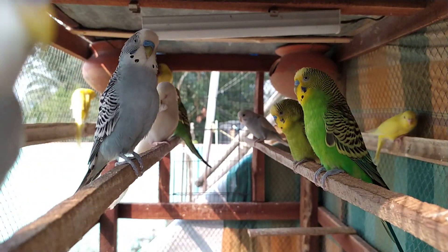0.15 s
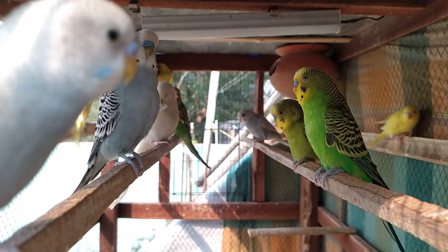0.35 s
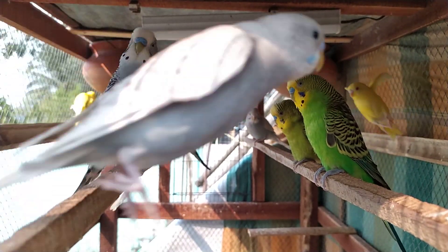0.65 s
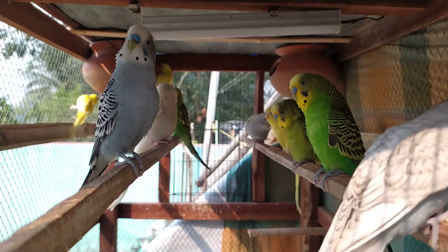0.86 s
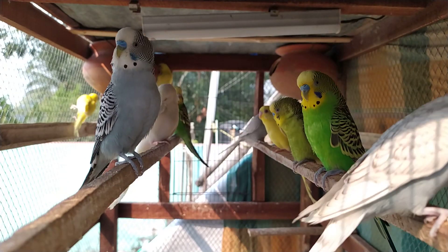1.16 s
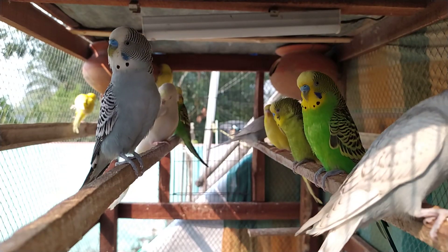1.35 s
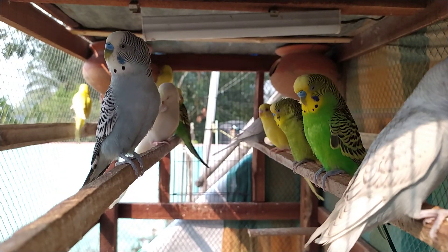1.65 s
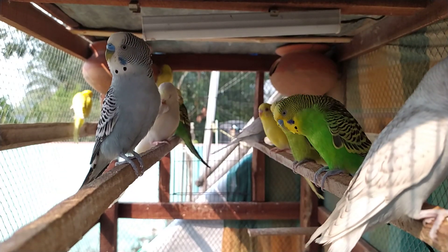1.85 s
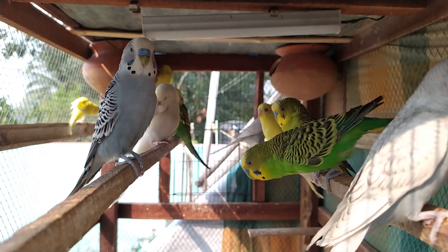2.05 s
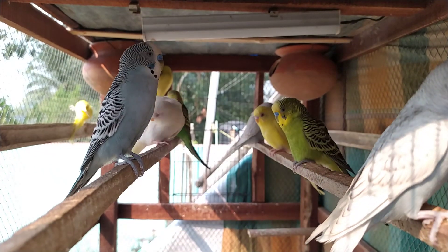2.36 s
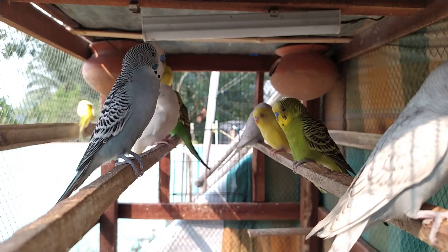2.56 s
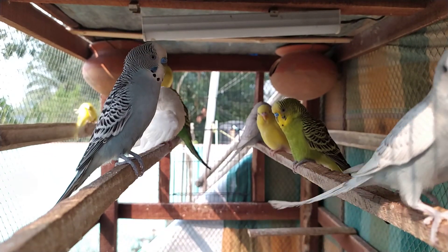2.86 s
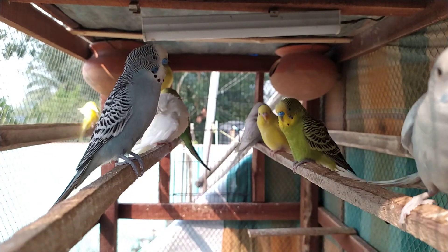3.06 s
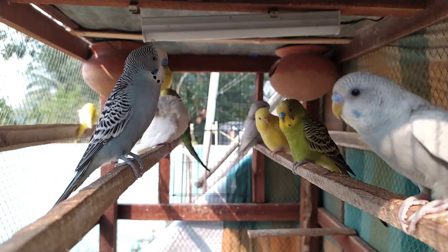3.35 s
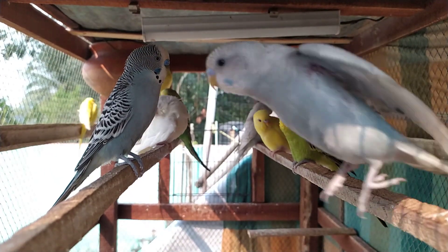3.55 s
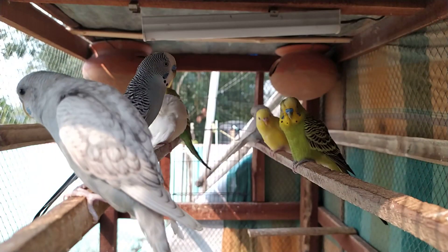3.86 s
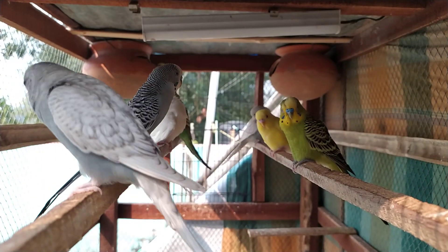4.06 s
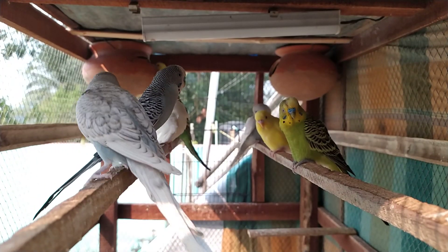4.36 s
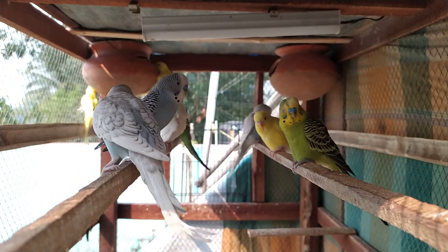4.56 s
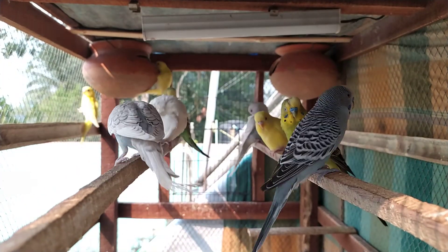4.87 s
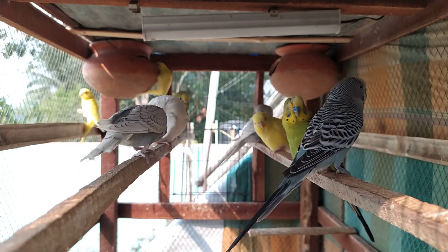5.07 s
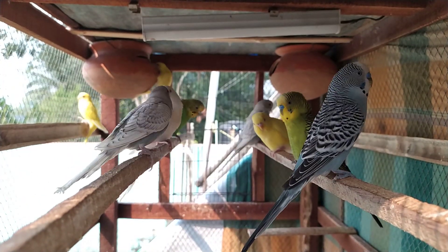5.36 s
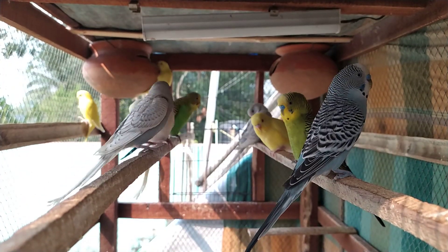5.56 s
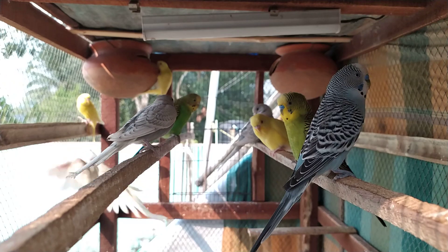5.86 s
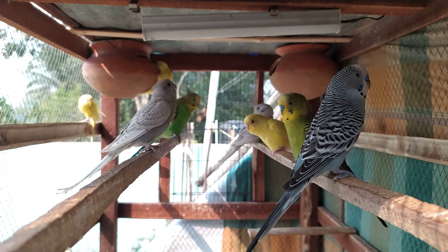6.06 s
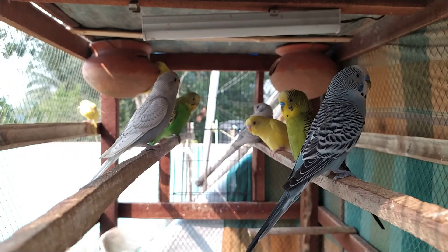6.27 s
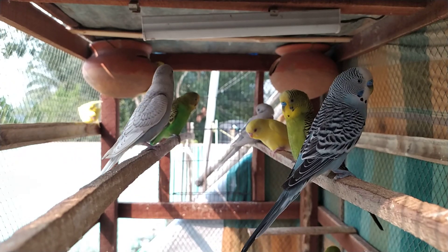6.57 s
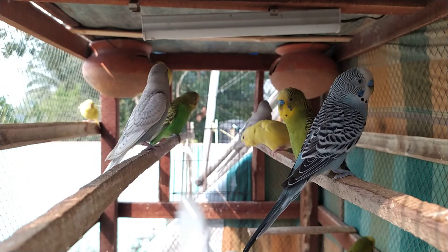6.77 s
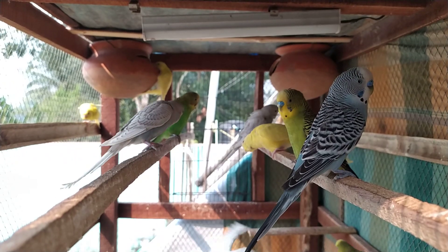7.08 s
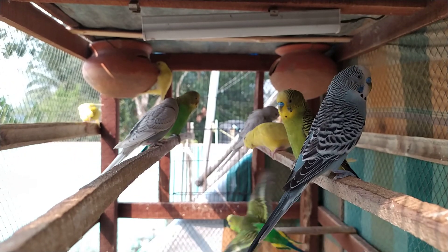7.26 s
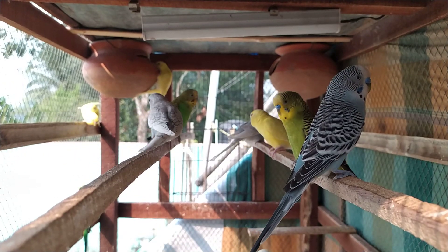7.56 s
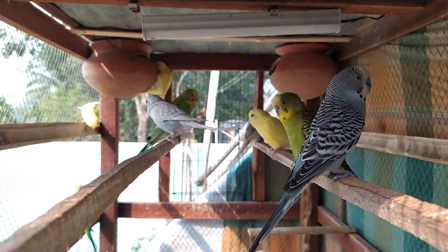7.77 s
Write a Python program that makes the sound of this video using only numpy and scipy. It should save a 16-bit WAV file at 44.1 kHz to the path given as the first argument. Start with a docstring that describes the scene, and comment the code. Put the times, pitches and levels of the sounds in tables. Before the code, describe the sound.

Small parrots chatter in an aviary: quick high chirps, buzzy warbled phrases and sudden harsh squawks over faint distant twittering and low wind rumble.

```python
"""Budgerigars close to a phone in a wooden aviary whistle fluttering syrinx notes and rasp loud squawks in puffs.
Far birds give low calls and even trills as gliding tones, a dove coos and the flock twitters at the far end.
Claws knock on perches as damped thuds; short flights, wings and feathers are shaped bands of noise.
The left port is open, the right is half covered and muffled; wind rumbles on both."""
import sys
import numpy as np
from scipy import signal
from scipy.fft import rfft, irfft, next_fast_len
from scipy.io import wavfile

SR = 44100
rng = np.random.default_rng(int(sys.argv[2]) if len(sys.argv) > 2 else 0)


def unload_wav(signal):
    """Save mono or channel-first audio to the path in sys.argv[1] as 16-bit WAV at rate SR, clipped to [-1, 1]."""
    wavfile.write(
        sys.argv[1],
        SR,
        np.round(np.clip(np.atleast_2d(signal).T, -1, 1) * 32767).astype(np.int16),
    )


N = 349272


def undb(db):
    """Decibels to gain."""
    return 10 ** (np.asarray(db) / 20)


def unit(x):
    """Scale to rms 1."""
    return x / np.sqrt(np.mean(x ** 2))


def noise():
    """White noise as long as the scene."""
    return rng.standard_normal(N)


def band(x, lo_hz, hi_hz, order=2):
    """Butterworth band-pass."""
    edges_hz = [lo_hz, min(hi_hz, SR / 2.1)]
    return signal.sosfilt(signal.butter(order, edges_hz, "band", fs=SR, output="sos"), x)


def walk(rate_hz):
    """Random levels drawn at a steady rate and joined by straight lines, scaled to rms 1."""
    step = int(SR / rate_hz)
    knots = N // step + 2
    return unit(np.interp(np.arange(N) / step, np.arange(knots), rng.standard_normal(knots)))


def running_phase(hz):
    """Phase in radians of a tone whose pitch moves."""
    return 2 * np.pi * np.cumsum(hz) / SR


def add(out, start_s, x):
    """Mix a sound in at its time."""
    i = int(start_s * SR)
    out[i:i + len(x)] += x[:N - i]


def swell(n, rise_s, fall_s):
    """Rounded rise and fall over n samples."""
    s = np.arange(n) / SR
    return np.sin(np.pi / 2 * np.clip(np.minimum(s / rise_s, s[::-1] / fall_s), 0, 1)) ** 2


# Late echo from the yard: decay time, level beside the early echo, upper edge
YARD_T60_S, YARD_DB, YARD_TOP_HZ = 0.35, -16, 4800


def woodwork(x, t60_s, wet_db):
    """Short dense echo from roof, nest pots and back wall, then a faint, dull, long one from the yard."""
    s = np.arange(int(YARD_T60_S * SR)) / SR
    air = rng.standard_normal(len(s))
    near = band(air, 200, 13800, order=1) * np.exp(-np.log(1000) * s / t60_s)
    yard = undb(YARD_DB) * band(air, 230, YARD_TOP_HZ, order=3) * np.exp(-np.log(1000) * s / YARD_T60_S)
    tail = (near + yard) * (s > .002)
    return x + undb(wet_db) * signal.fftconvolve(x, tail / np.linalg.norm(tail))[:N]


PORT_LAG_S = 36 / SR
# Response of the half-covered microphone port: pitch_hz, gain_db
PORT_RESPONSE = [(60, -29), (200, -38), (700, -61), (1300, -33), (2400, -33), (4400, -35.5), (8000, -48),
                 (15000, -45)]


def covered(x):
    """The covered port is nearer the birds: sound comes earlier but muffled."""
    size = next_fast_len(N)
    hz = np.arange(size // 2 + 1) * SR / size
    port_hz, port_db = np.transpose(PORT_RESPONSE)
    db = np.interp(np.log(hz + 1), np.log(port_hz), port_db)
    earlier = np.exp(2j * np.pi * hz * PORT_LAG_S)
    return irfft(rfft(x, size) * undb(db) * earlier, size)[:N]


# Wind on the microphone ports, mean of both before its random gusting: time_s, rumble_db
WIND_RUMBLE = [(0, -60.5), (.7, -56), (1.8, -59), (2.4, -55), (5.8, -56.5), (5.95, -43.5), (6.2, -53.5),
               (6.55, -45), (6.95, -60.5), (7.2, -45.5), (7.5, -56)]


def wind(shared):
    """Low buffeting noise that swells at random, partly the same on both ports."""
    both, left, right = (unit(band(noise(), 47.1, 77.3)) + 0.41 * unit(band(noise(), 79, 185))
                         for _ in range(3))
    ports = np.sqrt(shared) * both + np.sqrt(1 - shared) * np.array([left, right])
    db = np.interp(np.arange(N) / SR, *np.transpose(WIND_RUMBLE))
    return undb(db + 1.13 * walk(6.6)) * ports * undb([[1.5], [-1.5]])


def flicker(spectrum, width, shared_db, own_db, rate_hz):
    """Noise bands that swell a little together and flicker alone."""
    shared = shared_db * np.tanh(walk(rate_hz))
    total = np.zeros(N)
    for hz, db in spectrum:
        own = own_db * np.tanh(walk(3 * rate_hz))
        total += undb(db + shared + own) * unit(band(noise(), hz / width, hz * width))
    return unit(total)


# Colour of the feather rustle: band_centre_hz, relative_level_db
RUSTLE_BANDS = [(3200, 2.5), (4600, 1), (6500, 8), (9000, 8.5), (12000, -16), (15500, 4.5)]


def feather_rustle():
    """Feathers brush: high noise bands flicker quickly."""
    return flicker(RUSTLE_BANDS, width=1.2, shared_db=3.5, own_db=4, rate_hz=16)


# Colour of the background wing beats: band_centre_hz, relative_level_db
WING_BANDS = [(180, -8), (330, 7), (600, 3.5), (1000, 0), (1500, 8)]


def wing_beats():
    """Wings move air: low noise bands flicker more slowly."""
    return flicker(WING_BANDS, width=1.35, shared_db=3, own_db=4, rate_hz=10)


def straight(notes):
    """Notes of steady level and even glide, as two-point curves."""
    return [[(start, first_hz, db), (start + length, last_hz, db)]
            for start, length, first_hz, last_hz, db in notes]


def flock(count):
    """Many short random twitters of birds at the far end, with a short echo from the woodwork."""
    when, length, pitch, glide, loud = rng.random((count, 5)).T
    hz = 1300 + 2600 * np.sqrt(pitch)
    last_hz = hz * (.78 + 0.34 * glide)
    calls = np.transpose([7.85 * when, 0.0071 + 0.0176 * length, hz, last_hz, -7 * loud])
    twitter = whistle(straight(calls), flutter_db=-2.5, buzz=0.22, waver=0.025, overtone_db=-31.0,
                      rise_s=0.0032, fall_s=0.0059)
    return unit(woodwork(twitter, t60_s=0.062, wet_db=-10.5))


# Background through the aviary: time_s, chatter_db, rustle_db, wings_db
AVIARY_LEVELS = [(0, -46.5, -48, -63.5), (.24, -67, -68.5, -64), (.49, -103, -71, -64.5),
                 (.52, -63.5, -54.5, -68), (.71, -54.5, -50.5, -58.5), (1.65, -53, -55, -63.5),
                 (1.71, -67, -64.5, -67.5), (2.5, -57.5, -52, -58), (2.7, -60, -64.5, -61),
                 (3.28, -79, -65, -60.5), (3.7, -60, -56, -61), (3.8, -70, -66.5, -66.5),
                 (4.35, -71.5, -63, -65), (4.45, -51.5, -57.5, -59), (4.75, -73, -67, -62),
                 (5.15, -66, -58, -56), (5.45, -63, -65.5, -62.5), (6.2, -62, -57, -58),
                 (7.3, -69, -55, -59.5), (7.45, -67, -65.5, -61), (7.92, -63, -56.5, -62)]


def background():
    """Flock chatter, feathers and wings, each following its own level curve."""
    time_s, *curves = np.transpose(AVIARY_LEVELS)
    chatter_db, rustle_db, wings_db = (np.interp(np.arange(N) / SR, time_s, c) for c in curves)
    back = undb(chatter_db) * flock(count=1200)
    back += undb(rustle_db) * feather_rustle()
    return back + undb(wings_db) * wing_beats()


# A dove's coos: start_s, length_s, first_hz, last_hz, level_db
DOVE_COOS = [(3.07, 0.072, 410, 401, -57), (3.7, 0.21, 670, 651, -68), (4.79, 0.18, 690, 666, -68)]


def coos():
    """Low, almost pure tones that fade out softly."""
    return whistle(straight(DOVE_COOS), flutter_db=4.5, buzz=0, waver=0.00004, overtone_db=-32,
                   rise_s=0.0033, fall_s=0.077)


# Low calls of far birds: start_s, length_s, first_hz, last_hz, level_db
DISTANT_CALLS = [(.098, 0.01, 1280, 1230, -50.5), (.553, 0.043, 3100, 3730, -57),
                 (1.22, 0.092, 1265, 1235, -57), (1.602, 0.063, 1454, 1240, -52.5),
                 (1.73, 0.13, 1355, 1230, -58.5), (2.37, 0.1, 1400, 1352, -59.5),
                 (3.03, 0.075, 1300, 1390, -57.5), (3.17, 0.074, 1920, 1950, -58.5),
                 (4.01, .14, 1396, 1304, -59), (4.429, 0.06, 1130, 1193, -52.5),
                 (4.666, 0.071, 1313, 1562, -51), (5.438, 0.01, 1450, 1526, -51.5),
                 (5.498, 0.019, 1140, 1270, -52.5), (6.73, 0.024, 1580, 1720, -44.5),
                 (6.82, .11, 1380, 1290, -56), (7.585, 0.054, 2420, 2460, -56)]


def far_calls():
    """Faint gliding syrinx tones with weak overtones."""
    return whistle(straight(DISTANT_CALLS), flutter_db=2.5, buzz=0.1, waver=0.017, overtone_db=-30.0,
                   rise_s=0.0016, fall_s=0.015)


TRILL_HZ, TRILL_SWING_HZ, TRILL_RATE_HZ = 3370, 403, 11
# Even trills of a bird further off, levels before echo: start_s, length_s, level_db
DISTANT_TRILLS = [(4.413, 0.33, -67.5), (5.137, 0.24, -62.5), (6.038, 0.22, -61.5)]


def trills():
    """The pitch swings evenly up and down, loudest at the top, under a strong echo."""
    out = np.zeros(N)
    for start, length, db in DISTANT_TRILLS:
        swing = np.sin(2 * np.pi * TRILL_RATE_HZ * np.arange(int(length * SR)) / SR)
        tone = np.sin(running_phase(TRILL_HZ + TRILL_SWING_HZ * swing))
        add(out, start, undb(db + 0.72 * swing) * swell(len(swing), 0.015, 0.018) * tone)
    return woodwork(out, t60_s=0.1, wet_db=2.0)


WINGBEAT_HZ, FLAP_S = 16, 0.026  # each push of air peaks after half of FLAP_S
# Short flights near the phone: first_downstroke_s, length_s, first_level_db
NEAR_FLIGHTS = [(0.721, 0.14, -48), (0.978, 0.26, -59), (5.097, 0.23, -57.5)]


def flights():
    """Each downstroke pushes a low thump and a swish of air that dies away."""
    out, air = np.zeros(N), noise()
    air = unit(band(air, 90, 250)) + 1.18 * unit(band(air, 270, 1200)) + 0.31 * unit(band(air, 1030, 1440))
    for start, length, db in NEAR_FLIGHTS:
        s = np.arange(int(length * SR)) / SR
        since = s % (1 / WINGBEAT_HZ) / FLAP_S
        push = np.e * 2 * since * np.exp(-2 * since)
        add(out, start, undb(db - 4 * s / length) * push * air[int(start * SR):][:len(s)])
    return out


# Claws landing on perches: start_s, level_db, perch_hz, scratch_db (beside the thud)
PERCH_KNOCKS = [(2.143, -43.5, 340, -34), (2.739, -42.5, 367, -16.5), (3.63, -48.5, 336, 0),
                (4.79, -49.5, 413, -3.5), (5.582, -39.5, 149, -9.5), (7.818, -34, 150, -28)]


def knocks():
    """A claw lands: the perch gives a damped thud, the claw a short scratch."""
    out, s = np.zeros(N), np.arange(int(.06 * SR)) / SR
    scratch = unit(band(noise(), 380, 8700))
    for start, db, hz, scratch_db in PERCH_KNOCKS:
        thud = np.sin(2 * np.pi * hz * s) * np.exp(-s / 0.0097)
        thud += 9.1 * np.sin(2 * np.pi * 1.68 * hz * s) * np.exp(-s / 0.00045)  # brief click of a higher mode
        i = int(start * SR)
        scrape = undb(scratch_db) * scratch[i:i + len(s)] * np.exp(-s / 0.041)
        add(out, start, undb(db) * (thud + scrape))
    return out


BUZZ_HZ = 244.5  # mean beat rate
PURE_HZ = 3494  # lower notes are looser, higher ones steadier
THROAT_HZ, THROAT_WIDTH_HZ = 3530, 390
BREATH_DB = -23.5  # air that escapes beside a whistled tone, less on high notes


def whistle(calls, flutter_db, buzz, waver, overtone_db, rise_s, fall_s):
    """A near-sine syrinx tone, less steady on low notes; the throat lifts octaves that fall on it."""
    out, shake, flutter, patchy = np.zeros(N), walk(420), walk(300), walk(120)
    hoarse = 1 + 6 * buzz / 10 * walk(2600)  # turbulent air frays the tone
    breath = undb(BREATH_DB) * unit(band(noise(), 2960, 5650))
    # both halves of the syrinx beat against each other now and then
    beat_depth = np.clip(buzz * (1 + walk(40)), 0, 1)
    beat = beat_depth * np.sin(running_phase(BUZZ_HZ * (1 + 0.13 * walk(30))))
    for when, hz, curve_db in map(np.transpose, calls):
        at = slice(int(max(when[0], 0) * SR), min(int((when[-1] + fall_s / 2) * SR), N))
        s = np.arange(at.start, at.stop) / SR
        glide, db = np.interp(s, when, hz), np.interp(s, when, curve_db)
        loose = np.minimum(PURE_HZ / glide, 1.3) ** 4
        unsteady = np.minimum(loose, 1)
        phase = running_phase(glide * (1 + waver * loose * shake[at])) + 2 * np.pi * rng.random()
        lift_db = 11 * np.exp(-((2 * glide - THROAT_HZ) / THROAT_WIDTH_HZ) ** 2)
        # the third harmonic is left out where it would pass the digital limit
        overtones = np.sin(2 * phase) + 0.36 * np.sin(3 * phase) * (glide < SR / 7)
        overtones *= undb(overtone_db + lift_db + 2.4 * patchy[at])
        level = undb(db + flutter_db * unsteady * flutter[at]) * (1 + unsteady * beat[at])
        level *= np.sqrt(2) * hoarse[at] * swell(len(glide), rise_s, fall_s)
        out[at] += level * (np.sin(phase) + overtones + unsteady * breath[at])
    return out


PIP_S, PIP_FALL = 0.013, 0.95  # length, last pitch as a share of the first
UNDERTONE, UNDERTONE_DB = 0.78, -16  # weaker line below the held whistle: share of its pitch, level beside it
# Contact calls, a held whistle broken by a lower note: start_s, break_after_s, pitch_hz, level_db
HELD_CALLS = [(1.352, 0.057, 4040, -35.5), (3.372, 0.041, 3945, -36.5), (5.609, .059, 4133, -35.5),
              (6.919, 0.048, 4110, -35.5)]
# Their notes from the break on: delay_s, length_s, first_share and last_share of the call's pitch, relative_db
BREAK_NOTES = [(0, 0.0227, .79, 0.76, -1), (0.016, 0.051, 1, 0.96, 0.0), (.07, 0.045, 0.985, .98, -10)]
# Short high pips: start_s, first_hz, level_db
HIGH_PIPS = [(2.483, 5570, -37), (2.599, 5750, -22.5), (5.325, 4880, -46), (5.676, 4740, -32),
             (5.986, 5300, -44.5), (6.407, 5360, -46), (6.453, 4940, -49), (6.498, 4950, -46.5),
             (7.246, 5360, -47), (7.289, 5270, -42.5), (7.335, 4940, -46.5)]
# Steep streaks, some of them bright octave overtones of chirps and phrases sounding at the same time:
# start_s, length_s, first_hz, last_hz, level_db
STREAK_LINES = [(1.87, 0.0069, 2130, 1660, -38.5), (2.266, 0.013, 3730, 3270, -36),
                (2.305, 0.023, 4410, 5670, -38), (2.576, 0.0055, 4040, 2370, -32),
                (4.107, 0.03, 9640, 8100, -40), (5.679, 0.034, 8800, 6160, -36),
                (7.102, 0.034, 8180, 7300, -36)]


def short_calls():
    """Contact calls hold their pitch, then break into the same notes; pips and streaks, some overtones, glide."""
    held = [(start, pause, 1.01 * hz, hz, db) for start, pause, hz, db in HELD_CALLS]
    under = [(start, length, UNDERTONE * first_hz, UNDERTONE * last_hz, db + UNDERTONE_DB)
             for start, length, first_hz, last_hz, db in held]
    rest = [(start + pause + delay, length, hz * first, hz * last, db + note_db)
            for start, pause, hz, db in HELD_CALLS
            for delay, length, first, last, note_db in BREAK_NOTES]
    pips = [(start, PIP_S, hz, hz * PIP_FALL, db) for start, hz, db in HIGH_PIPS]
    return whistle(straight(held + under + rest + pips + STREAK_LINES), flutter_db=3.0, buzz=0.34,
                   waver=0.026, overtone_db=-18, rise_s=0.006, fall_s=0.01)


# Chirps of near birds, mostly falling, one curve each: time_s, pitch_hz, level_db
CHIRP_CURVES = [
    [(0.0, 3610, -41), (0.012, 2780, -56), (0.045, 2710, -56)],
    [(2.425, 3600, -43), (2.445, 3920, -58), (2.463, 3350, -34), (2.477, 3240, -50), (2.487, 2693, -35.5),
     (2.505, 2680, -57)],
    [(2.528, 4430, -36), (2.536, 4190, -33), (2.56, 4340, -46), (2.574, 3590, -38), (2.59, 3740, -42),
     (2.612, 3070, -29)],
    [(3.993, 3120, -48), (4.005, 3250, -37.5), (4.027, 3186, -47), (4.033, 2974, -33), (4.041, 2830, -35),
     (4.06, 2970, -60)],
    [(4.097, 4280, -52), (4.11, 4740, -40.5), (4.14, 3850, -38.5)],
    [(4.144, 2900, -24), (4.157, 4090, -42.5), (4.165, 3790, -21.5), (4.21, 3730, -75)],
    [(4.59, 3050, -61), (4.61, 2985, -46), (4.64, 2810, -51), (4.65, 2800, -60)],
    [(4.805, 3400, -46.5), (4.817, 2930, -42), (4.843, 3200, -46), (4.851, 3085, -32), (4.87, 3030, -81)],
    [(5.008, 2713, -37), (5.022, 2970, -45), (5.03, 3140, -30), (5.04, 3705, -35.5), (5.05, 3740, -32)],
    [(6.797, 3800, -38), (6.805, 3885, -37), (6.835, 3560, -35.5), (6.843, 3226, -43), (6.855, 3284, -29),
     (6.91, 3440, -40.5)],
    [(7.1, 4050, -51), (7.108, 4040, -39.5), (7.148, 3374, -26.5), (7.17, 3477, -36), (7.18, 3390, -23),
     (7.26, 3433, -58.5)],
    [(7.614, 3270, -45), (7.62, 3357, -34.5), (7.64, 2450, -40.5), (7.684, 2415, -43), (7.695, 2400, -59)],
]


def chirps():
    """Fluttering syrinx tones with a sharp start and little buzz."""
    return whistle(CHIRP_CURVES, flutter_db=4.5, buzz=0.16, waver=0.019, overtone_db=-18.5,
                   rise_s=0.001, fall_s=0.0041)


# Strokes of warbled phrases of near birds, several to a phrase, some sounding together, one curve a stroke:
# time_s, pitch_hz, level_db
PHRASE_STROKES = [
    [(1.035, 2970, -43), (1.045, 3107, -32), (1.063, 3210, -33), (1.075, 3620, -33), (1.097, 2340, -39)],
    [(1.1, 1930, -42), (1.106, 1983, -37), (1.113, 2605, -38), (1.119, 3255, -34), (1.13, 2940, -34),
     (1.136, 1870, -37.5), (1.14, 1420, -48)],
    [(1.14, 2790, -31), (1.144, 3396, -32), (1.149, 3926, -42), (1.157, 2920, -36), (1.16, 1900, -42),
     (1.166, 2590, -47), (1.172, 2644, -34), (1.178, 1574, -40), (1.185, 1720, -38.5)],
    [(1.16, 3750, -40), (1.185, 3600, -36.5), (1.2, 3495, -41), (1.21, 3050, -31), (1.235, 3020, -40),
     (1.245, 3620, -33)],
    [(1.186, 2520, -43), (1.202, 2540, -32), (1.22, 2507, -39), (1.225, 1847, -43.5), (1.232, 1610, -35)],
    [(1.247, 2314, -37), (1.262, 2510, -46), (1.268, 2190, -50), (1.271, 2940, -35), (1.281, 2630, -33),
     (1.299, 2230, -44), (1.308, 2000, -53)],
    [(1.713, 2960, -52), (1.728, 1814, -51.5), (1.754, 1738, -44), (1.776, 1870, -49), (1.786, 1690, -38)],
    [(1.78, 3340, -36), (1.79, 3107, -41), (1.798, 2460, -36.5), (1.815, 2140, -46), (1.82, 2540, -36)],
    [(1.822, 3530, -32), (1.832, 2404, -45), (1.836, 3120, -32.5), (1.848, 3550, -33), (1.868, 2900, -42),
     (1.877, 3460, -42), (1.886, 3140, -32), (1.898, 3130, -31.5), (1.905, 3330, -56)],
    [(2.145, 2188, -49), (2.173, 2898, -39.5), (2.187, 3473, -28.5), (2.199, 2220, -39.5),
     (2.204, 1666, -43), (2.218, 1690, -44)],
    [(2.2, 3120, -36), (2.217, 3126, -42), (2.225, 2620, -42), (2.238, 2602, -41), (2.255, 2090, -40.5),
     (2.296, 1733, -47)],
    [(2.293, 3160, -46), (2.303, 3255, -48), (2.309, 2319, -37), (2.32, 2758, -41), (2.33, 3140, -34),
     (2.338, 3240, -52)],
    [(3.797, 2620, -44.5), (3.822, 2960, -38), (3.829, 3500, -41.5), (3.838, 2620, -38), (3.845, 1690, -46),
     (3.853, 1200, -55)],
    [(3.862, 2900, -39), (3.867, 2450, -42), (3.89, 2150, -46), (3.905, 1720, -53), (3.912, 2020, -53)],
    [(3.908, 3350, -36.5), (3.918, 3390, -39)],
    [(3.922, 2180, -47), (3.935, 2645, -37), (3.943, 2525, -41), (3.946, 3090, -32.5), (3.95, 2605, -42),
     (3.962, 2616, -44), (3.99, 2060, -47)],
    [(4.525, 2355, -54), (4.551, 2164, -44), (4.565, 1880, -65), (4.577, 2320, -54), (4.588, 1500, -42.5)],
    [(6.675, 2293, -61), (6.705, 2650, -42), (6.716, 2530, -45), (6.72, 3235, -43), (6.748, 3190, -42.5),
     (6.755, 2440, -42.5), (6.777, 2760, -40), (6.795, 2180, -37)],
]


def phrases():
    """Buzzing syrinx tones that leap and glide in pitch, some strokes sounding together."""
    return whistle(PHRASE_STROKES, flutter_db=3.0, buzz=0.33, waver=0.015, overtone_db=-20,
                   rise_s=0.0018, fall_s=0.003)


RASP_HZ = 189.3  # mean puff rate
# Pitch spread between puffs, pitch shake (scaled by the hiss, up to -3 dB), rise in level over a squawk
PUFF_SCATTER, SHAKE, GROWTH_DB = 0.0588, 0.1293, 8
# Rasping squawks of near birds, level reached about two thirds through the rise, voice and hiss beside the octave:
# start_s, length_s, level_db, first_hz, last_hz, fundamental_db, hiss_db
RASPED_SQUAWKS = [(1.405, 0.038, -47, 2910, 2900, 7.5, 8), (1.971, 0.06, -22, 2990, 2910, -13.5, -4),
                  (2.266, 0.073, -46, 3080, 2996, 12.5, 5.5), (2.572, 0.04, -45, 2790, 2914, 4.5, 7.5),
                  (2.874, 0.078, -14, 2628, 2898, -26, -10), (3.307, 0.061, -23, 2887, 3090, -14, 1),
                  (3.482, 0.064, -18.5, 2760, 3260, -8, -6.5),
                  (3.612, 0.071, -23.5, 2483, 3343, -4.5, -2.5), (4.134, 0.019, -41, 3890, 3700, 2, -5),
                  (4.908, 0.013, -33.5, 2845, 2756, -5, 3.5), (5.045, 0.047, -33, 3100, 3210, 2.5, 1.5),
                  (5.667, 0.04, -27.5, 3100, 3220, -7.5, -8), (5.862, 0.054, -18, 2900, 3306, -19, -8),
                  (7.15, 0.029, -38, 3340, 3310, 8, 1)]


def squawks():
    """The syrinx opens in uneven, growing puffs, each detuned, ringing on its harmonics and blowing broad hiss."""
    out, shake = np.zeros(N), walk(1200)
    cycles = np.cumsum(RASP_HZ * (1 + 0.1204 * walk(90))) / SR
    per_puff = rng.standard_normal((int(cycles[-1]) + 1, 2))
    size, detune = np.tanh(per_puff[cycles.astype(int)]).T
    gate = np.sin(np.pi * cycles) ** 2
    puffs = unit((gate ** 1.3 + .07) * undb(6.5 * size))
    air = noise()
    hiss = 0.76 * band(air, 1780, 10550, order=4) + 0.4 * band(air[::-1], 9200, 14000)
    hiss = unit(hiss + 1.6 * band(air[::-1], 4560, 6400) + 1.25 * band(air[::-1], 2800, 3870))
    for start, length, db, first_hz, last_hz, fundamental_db, hiss_db in RASPED_SQUAWKS:
        n, i = int(length * SR), int(start * SR)
        at = slice(i, i + n)
        bend = PUFF_SCATTER * detune[at] + SHAKE * undb(min(hiss_db, -3)) * shake[at]
        phase = running_phase(np.linspace(first_hz, last_hz, n) * (1 + bend))
        voice = undb(fundamental_db) * np.sin(phase) + np.sin(2 * phase)
        voice += undb(-13.5) * np.sin(3 * phase) + undb(-20) * np.sin(4 * phase)
        breath = undb(hiss_db) * np.sqrt(puffs[at]) * hiss[at]
        level = undb(db + GROWTH_DB * np.linspace(-.7, .3, n)) * swell(n, 0.0092, 0.0083)
        add(out, start, level * (puffs[at] * voice + breath))
    return band(out, 560, 17000, order=3)


# Table levels other than the wind's are means of the two ports; the open one carries nearly all of the sound.
OPEN_PORT_DB = 6


def scene():
    """Birds in the woodwork reach the open and the covered port, each by its own echoes."""
    birds = trills() + far_calls() + coos() + chirps() + short_calls() + phrases()
    near = flights() + knocks() + squawks()
    back = background()
    left = woodwork(birds, t60_s=0.1, wet_db=-7.5) + woodwork(near, t60_s=0.073, wet_db=-9.0) + back
    right = covered(woodwork(birds + near, t60_s=.1, wet_db=-1) + back)
    return undb(OPEN_PORT_DB) * np.array([left, right]) + wind(shared=0.59)


TOP_HZ, CEILING = 16000, .85


def record(dry):
    """Ports add faint hiss and a partly shared murmur; the loudest peaks are rounded and the top is cut steeply."""
    hiss = undb(-74.0) * rng.standard_normal(dry.shape)
    murmur = undb(-71.5) * unit(band(rng.standard_normal(dry.shape) + noise(), 226, 540, order=1))
    rounded = CEILING * np.tanh((dry + hiss + murmur) / CEILING)
    return signal.sosfilt(signal.ellip(10, .2, 80, TOP_HZ, fs=SR, output="sos"), rounded)


dry = scene()
out = record(dry)
unload_wav(out)
```